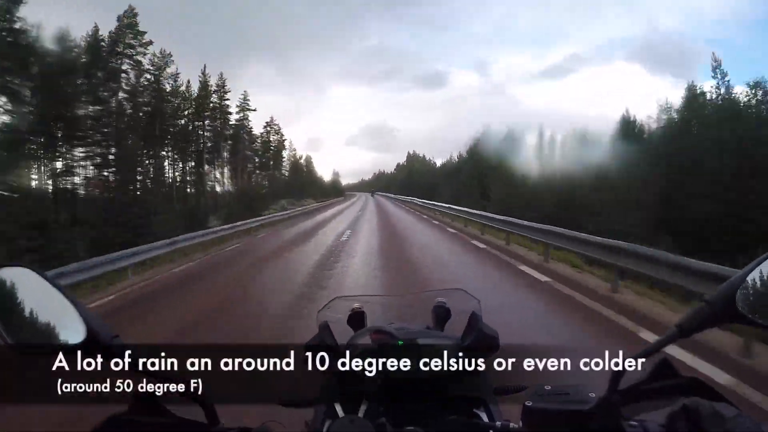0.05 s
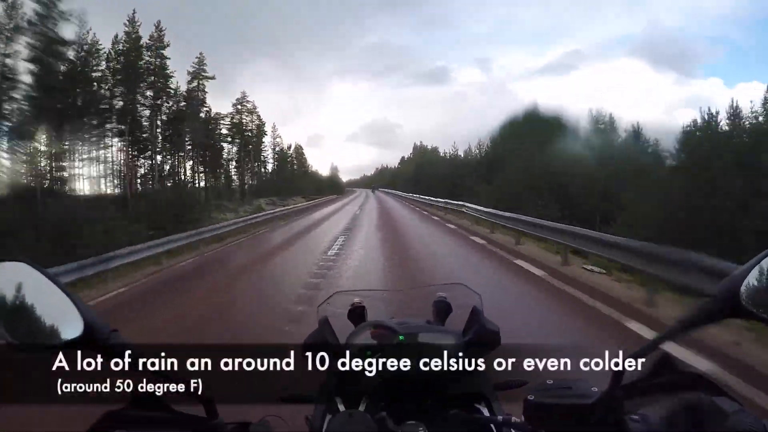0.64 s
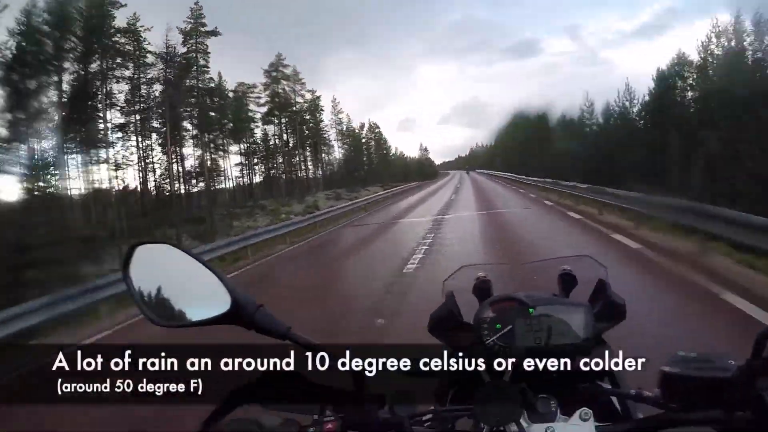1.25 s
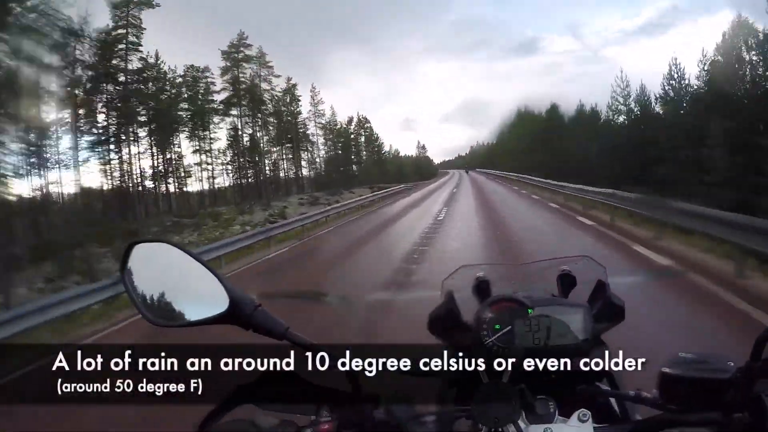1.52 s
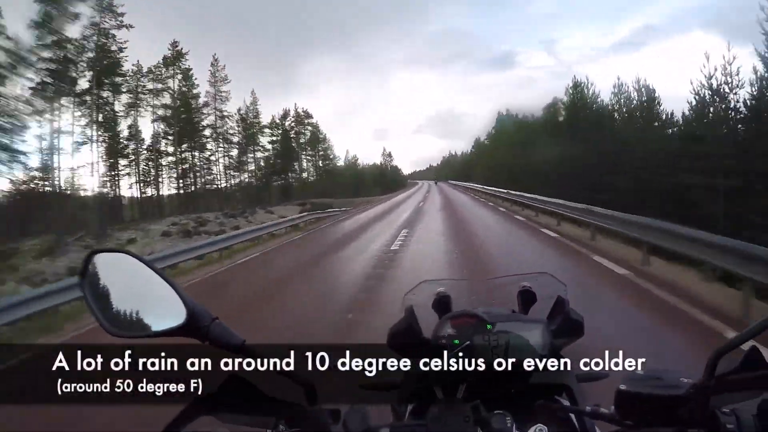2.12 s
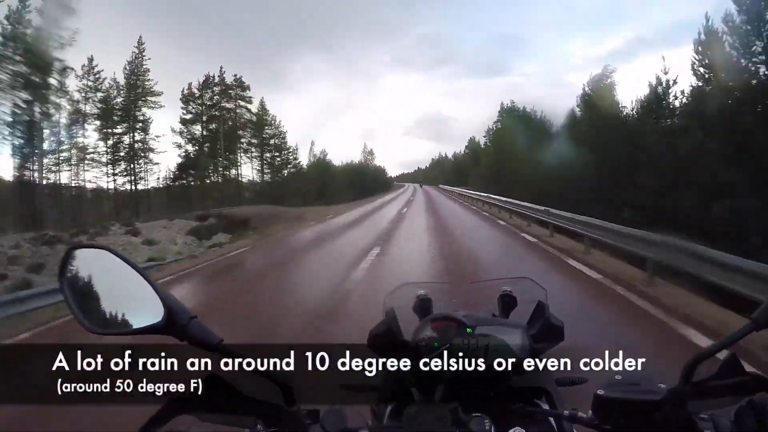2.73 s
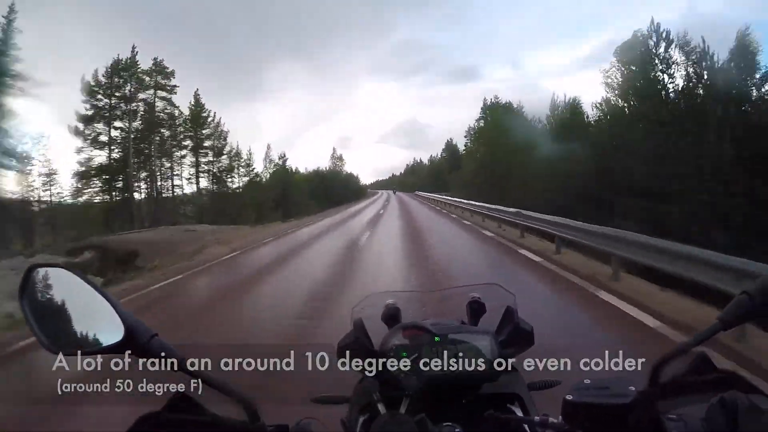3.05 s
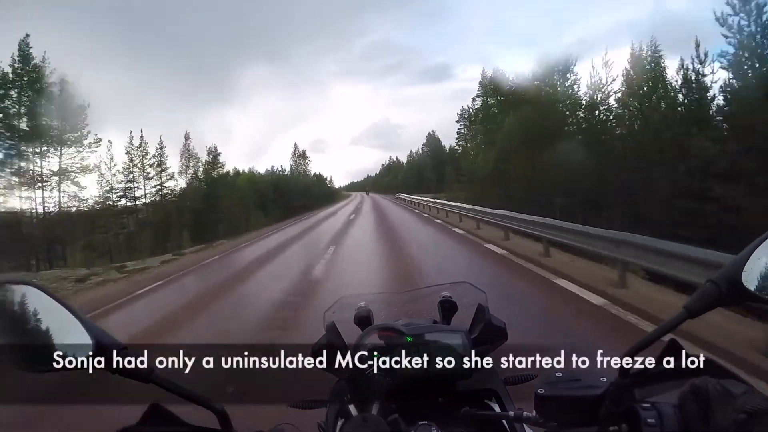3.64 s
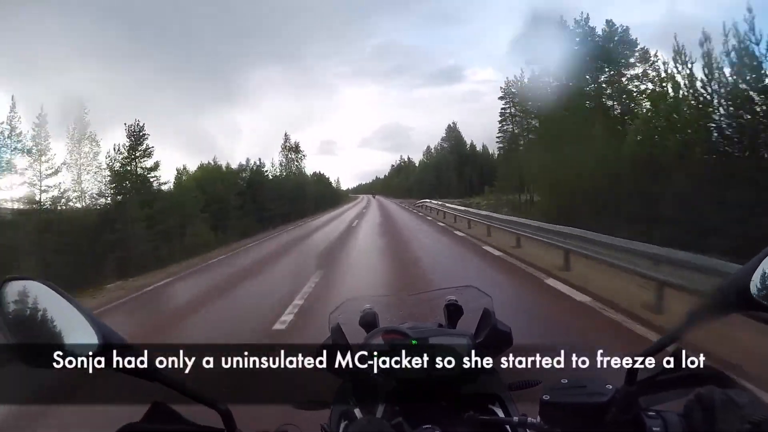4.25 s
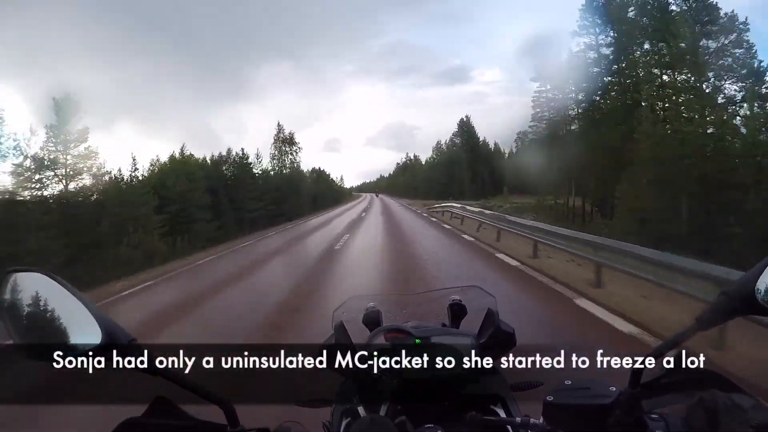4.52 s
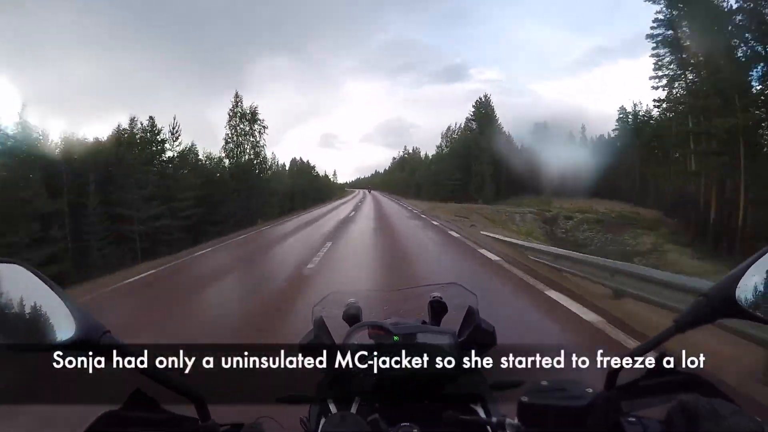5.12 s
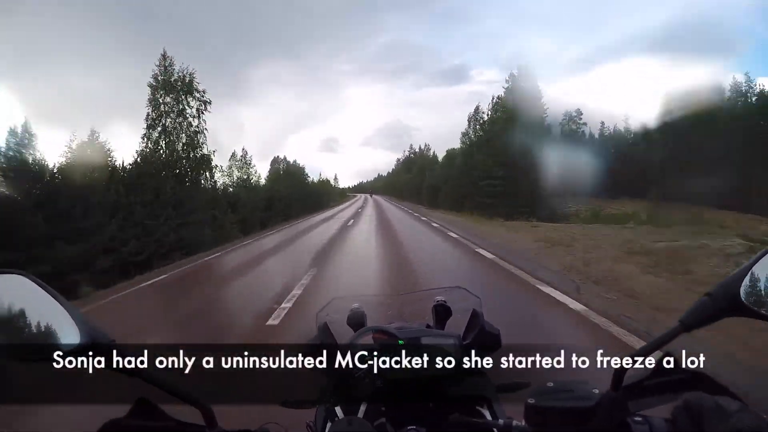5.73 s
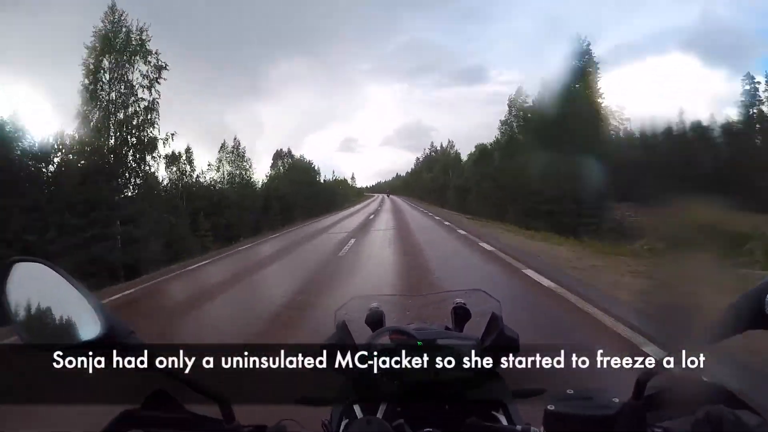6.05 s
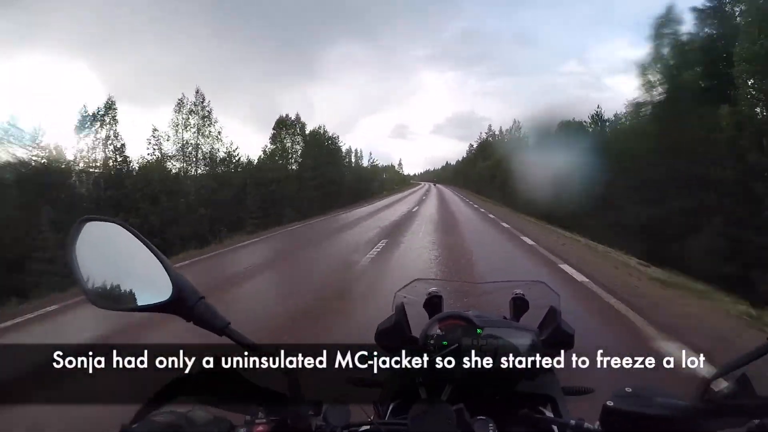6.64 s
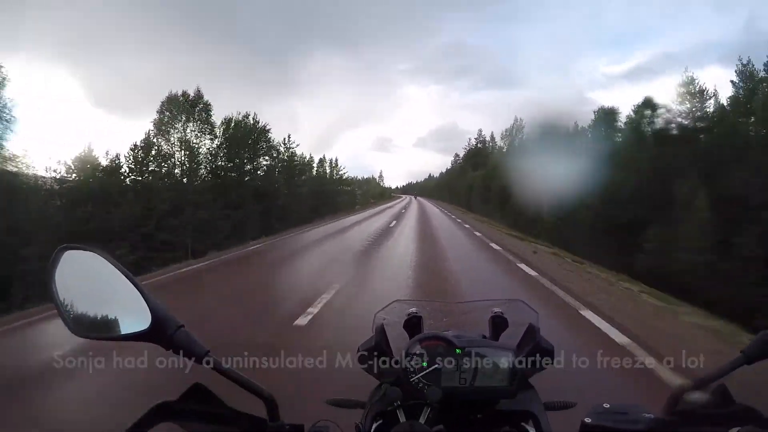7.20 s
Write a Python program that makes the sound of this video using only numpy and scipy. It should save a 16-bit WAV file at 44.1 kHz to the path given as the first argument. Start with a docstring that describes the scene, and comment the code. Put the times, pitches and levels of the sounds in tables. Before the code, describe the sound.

A motorcycle holds a constant speed on a wet road, heard from the rider's position with the wind right on the microphone. Deep, uneven thumps and a fluttering rush of air dominate, while the engine's even drone and a fine hiss of spray sit behind. Scattered water drops tick close by throughout. Gusts swell and pass with short lulls, the strongest coming near the middle and again a little later.

```python
"""A motorcycle cruises at a steady speed on a wet road, heard from a camera carried by the rider.
From the start the engine drones and spray hisses, while eddies from the windscreen thump the microphone
and tear the rush of air into a flutter. Just before 1 s the fattest of many water drops ticks on the
housing. The wind sinks near 1.8 s, then gusts hard around 3 s and 5.2 s, with brief lulls in between.
It keeps buffeting over the engine to the end, at 7.5 s."""
import sys
import numpy as np
from scipy import signal
from scipy.fft import rfft, irfft, next_fast_len
from scipy.io import wavfile
from scipy.ndimage import uniform_filter1d

SR = 44100
rng = np.random.default_rng(int(sys.argv[2]) if len(sys.argv) > 2 else 0)


def master(y):
    """Save y as 16-bit WAV."""
    cut = np.clip(np.atleast_2d(y).T, -1, 1)
    pcm = np.round(cut * 32767)  # scale
    wavfile.write(sys.argv[1], SR, pcm.astype(np.int16))


N = 329603
T = np.arange(N) / SR


def undb(db):
    """Decibels to gain."""
    return 10 ** (np.asarray(db) / 20)


def unit(x):
    """Scale to rms 1."""
    return x / np.sqrt(np.mean(x ** 2))


def noise():
    """White noise."""
    return rng.standard_normal(N)


def wobble(rate_hz):
    """Random modulator: sample and hold, smoothed twice; spread near 1."""
    hold = max(int(SR / rate_hz), 2)
    steps = np.repeat(rng.standard_normal(N // hold + 1), hold)
    return 1.113 * uniform_filter1d(uniform_filter1d(steps, hold), hold)[:N]


# resonances of the camera housing: f/Hz, width/Hz, boost/dB
HOUSING_PEAKS = [(783, 75, 4.5), (1133, 105, 5.5), (3320, 78, 5.5), (4350, 430, 6), (6740, 160, 5.5),
                 (7570, 420, 3.6)]


def colour(x, eq):
    """Shape x with an EQ curve, 12 dB/octave skirts and the resonances of the housing; rms 1."""
    size = next_fast_len(N)
    f = np.arange(size // 2 + 1) * SR / size + 1e-3
    hz, db = np.transpose(eq)
    shape_db = np.interp(np.log(f), np.log(hz), db)
    shape_db -= 40 * np.log10(np.maximum(f / hz[-1], 1) * np.maximum(hz[0] / f, 1))
    for centre, width, boost_db in HOUSING_PEAKS:
        shape_db += boost_db / (1 + (2 * (f - centre) / width) ** 2)
    return unit(irfft(rfft(x, size) * undb(shape_db), size)[:N])


# engine speed: t/s, four-stroke cycle rate/Hz
CYCLE_RATE = [(0, 28.56), (1.6, 28.52), (3.9, 28.39), (5.5, 28.42), (7.47, 28.48)]
# exhaust and engine drone: multiple of the cycle rate, level/dB
DRONE_HARMONICS = [(3, -33.5), (4, -37.5), (5, -40), (6, -45), (8, -45.5), (11, -43), (12, -47.5),
                   (13, -48.5), (14, -53), (18, -55.5), (19, -52), (21, -55), (26, -52.5), (27, -61),
                   (34, -55), (40, -59.5), (41, -54), (42, -56), (53, -57), (60, -59.5), (61, -57)]
# gear and chain whine at cruising speed: f/Hz, level/dB
GEAR_WHINE = [(1030, -69), (1345, -55.5), (1431, -63), (1488, -61), (1660, -58.5), (1919, -57),
              (2290, -60.5)]


def engine(trim_db=-0.5, waver_db=3, drift=0.001824, clatter_db=-48, blur_rad=.8):
    """Exhaust drone and gear whine follow the crankshaft and waver in the air stream; valves clatter."""
    cycle_hz = np.interp(T, *np.transpose(CYCLE_RATE))
    cycles = np.cumsum(cycle_hz * (1 + drift * wobble(5))) / SR
    partials = DRONE_HARMONICS + [(hz / cycle_hz.mean(), db) for hz, db in GEAR_WHINE]
    drone = 0
    for multiple, db in partials:
        tone = np.sin(2 * np.pi * (multiple * cycles + rng.random()) + blur_rad * wobble(16))
        drone += undb(db) * unit(tone * undb(waver_db * wobble(6)))
    valve_envelope = np.exp(-(cycles % 1) / 0.21)  # one burst a cycle
    clatter = colour(noise() * valve_envelope, RUSH_EQ)  # shares the EQ of the air rush
    return drone * undb(trim_db) + clatter * undb(clatter_db)


# bright, wet hiss: f/Hz, level/dB
SPRAY_EQ = [(1500, -5.5), (2700, 0), (3600, 3), (3950, -2.5), (4400, -2.5), (5600, 0), (6300, -3.5),
            (7300, -1.5), (9000, -1), (11300, -4), (13000, -13), (15000, -23)]


def spray(stir_db, ride_db, mist_db=-46.5, grain_db=2.5, tyres_db=-53):
    """Grainy mist, carried by the gusts and eddies, over the even hiss of the tyres."""
    grains = noise() * undb(grain_db * np.minimum(rng.exponential(size=N), 5))
    mist = colour(grains * undb(0.94 * stir_db + .5 * wobble(40)), SPRAY_EQ)
    tyres = colour(noise(), SPRAY_EQ)
    return mist * undb(mist_db + ride_db) + tyres * undb(tyres_db)


def splat(ring_hz, knock_hz, knock_db, thud_db, thud_hz=750, attack_s=.0008):
    """One drop: a spatter of a few milliseconds rings the housing over a duller knock and thud; peak 1."""
    size = 1024
    t = np.arange(size) / SR
    f = np.arange(1, size // 2 + 2) * SR / size

    def band(hz, octaves):
        return np.exp(-.5 * (np.log2(f / hz) / octaves) ** 2)

    burst = rfft(rng.standard_normal(size) * t * np.exp(-t / attack_s))
    burst /= np.sqrt(np.abs(burst))  # flatten the spatter so no one pitch stands out
    ring = .3 + band(ring_hz, octaves=.36)  # on a broadband floor
    knock = undb(knock_db) * band(knock_hz, octaves=.36)
    thud = undb(thud_db) * band(thud_hz, octaves=.7)
    high_cut = 1 / np.sqrt(1 + (f / (ring_hz + 2500)) ** 16)
    tick = irfft(burst * (ring + knock + thud) * high_cut)
    return tick / np.abs(tick).max()


# fat drops on the housing: t/s, peak level/dB, ring f/Hz, knock f/Hz, knock/dB re ring, thud/dB re ring
FAT_DROPS = [(.8621, -14.5, 6700, 2150, 6, 12), (.8769, -27, 7900, 2300, -8, -10),
             (1.941, -25.5, 6200, 3200, 1, 6), (2.9347, -28, 7300, 2300, -6, -10),
             (3.4057, -21, 7300, 2300, 4, 10), (3.603, -21.5, 8200, 3300, -2, 3),
             (3.7444, -29, 5200, 2300, -8, -10), (4.013, -20, 7700, 2150, 9, 0),
             (4.2009, -26, 8900, 2300, -10, -10), (4.2134, -28, 8400, 2300, -10, -10),
             (4.2298, -26.5, 10800, 1800, -2, -6), (4.494, -30, 6800, 2300, -8, -10),
             (5.1587, -22, 7600, 3300, -2, 2), (5.4121, -24.5, 4800, 3100, -1, 5),
             (5.7877, -26, 6900, 2300, -10, -10), (6.1613, -25, 5000, 2300, -12, -12),
             (6.9037, -30, 6300, 2300, -10, -10), (7.4026, -27, 7700, 2300, -8, -10)]


def drops(small_count=70, softest_db=-40.5):
    """Water ticks on the housing: a few fat drops among a random scatter of small ones."""
    small_drops = [(when * N / SR, softest_db + 6 * weight, 4000 + 5000 * pitch, 2300, -8, -6)
                   for when, weight, pitch in rng.random((small_count, 3))]
    ticks = np.zeros(N + SR)
    for s, db, *timbre in FAT_DROPS + small_drops:
        tick, start = splat(*timbre), int(s * SR)
        ticks[start:start + len(tick)] += undb(db) * tick
    return ticks[:N]


# wind swells: peak t/s, attack/s, release/s, rush lift/dB, buffet lift/dB, mist lift/dB
GUST_CUES = [(0.3, 0.24, 0.64, 2.5, 1.5, 2.5), (.577, 0.034, 0.04, 3.5, 3, 2),
             (0.9, 0.16, 0.097, 5, 7.5, 6), (1.168, 0.025, .03, 2, 2.5, 1), (1.41, 0.41, 0.95, 4, 2, 3.5),
             (1.417, 0.019, .025, 1, 6, 2), (1.61, .08, 0.046, 1, 2, 0), (1.873, .02, 0.017, 2.5, 3, 5),
             (2.18, 0.19, 0.26, 3.5, 5.5, 3), (2.487, 0.043, 0.031, 4, 5.5, 3.5),
             (2.77, 0.28, 0.071, 3.5, 4, 2.5), (2.955, 0.22, 0.063, 7, 8, 7),
             (3.335, 0.027, .06, 1, 6.5, 0), (3.71, 0.18, 0.22, 3.3, 8, 3.5), (3.903, .015, 0.016, 4, 8, 9),
             (3.986, 0.023, .025, 2, 5.5, -1), (4.3, 0.29, 0.74, 2.0, 5, 3.5),
             (4.301, .02, 0.024, 1, 10, -1), (4.35, 0.023, .025, -2, 9, 1), (4.805, .015, 0.025, 3, 1, 0),
             (4.92, 0.094, 0.13, 6, 7, 4.5), (5.22, 0.26, 0.22, 7.5, 5, 7), (5.49, 0.18, 0.18, 5, 5, 5),
             (5.871, 0.12, 0.039, 3.5, 7, 3), (6.38, 0.1, 0.12, 4, 3, 2.5), (6.62, 0.34, 0.28, 4, 1.3, 4),
             (7.22, 0.22, 0.22, 4.5, 6, 4.5), (7.45, 0.065, 0.11, 1, 1.5, 2.5)]


def gusts():
    """Gusts build and pass: fader rides in dB for the rush, the buffeting and the mist."""
    rides_db = 0
    for s, attack_s, release_s, *lifts_db in GUST_CUES:
        swell = np.interp(T, [s - attack_s, s, s + release_s], [0, 1, 0])
        rides_db += np.outer(lifts_db, swell)
    return rides_db


# holes in the wind: deepest t/s, ramp each way/s, rush dip/dB, rumble dip/dB (a negative dip lifts)
LULL_CUES = [(.13, 0.023, 6.5, 5), (.75, 0.049, -2, 8), (1.0, .025, 2, 2), (1.107, 0.022, 2, 2),
             (1.364, .025, 5, 0), (1.444, .016, 6, 8), (1.815, 0.082, 7.5, 10), (1.897, 0.018, 12, -1.5),
             (1.966, 0.018, 9, -1), (2.066, .025, 3, -1), (2.52, 0.028, 2.5, -1), (2.993, .015, 4, 1.5),
             (3.06, 0.031, 1, 2.5), (3.27, 0.2, 2.5, -1.5), (3.89, 0.058, 9.5, 3), (4.08, 0.023, 0, 4),
             (4.54, 0.012, 11, -4), (4.61, 0.084, 5.5, 3), (4.757, 0.079, 4.5, 1), (5.074, .022, 1, 9),
             (5.436, 0.013, 3, 5), (5.72, 0.081, 1, 2.5), (5.93, 0.028, 0.5, 4), (6.02, 0.03, 2.5, 6),
             (6.13, 0.021, 6, 12), (6.88, 0.051, 1.5, 4)]


def lulls():
    """The air stream lets go of the camera: fader rides in dB for the rush and the rumble."""
    rush_db, rumble_db = 0, 0
    for s, ramp_s, rush_dip_db, rumble_dip_db in LULL_CUES:
        calm = np.interp(T, [s - ramp_s, s, s + ramp_s], [0, 1, 0])
        rush_db -= rush_dip_db * calm
        rumble_db -= rumble_dip_db * calm
    return rush_db, rumble_db


# sub-bass rumble of the eddies: f/Hz, level/dB
RUMBLE_EQ = [(5, -14.5), (16, -2.5), (33, 1.5), (48, -4), (65, -10), (90, -17.5), (140, -36), (300, -53)]
# big vortex hits: t/s, suction re rumble rms, length crest to crest/s, duck just before/dB, slap/dB
VORTEX_HITS = [(.17, 1.8, .02, -1, 2.5), (.328, 1.8, .018, -1, 2.5), (.352, 2.3, .022, -1, 3),
               (.382, 2.6, .026, -9, 0), (.528, 2.6, .015, 0, -2), (.617, 2.3, .03, -6, -1),
               (.876, 1.8, .009, 0, 0), (.911, 2.7, .011, 0, -1), (.975, 2.2, .03, 0, 1),
               (1.220, 2.5, .016, -1, 1.5), (1.399, 3.1, .02, -4, 2), (1.617, 1.9, .02, 0, 2),
               (1.756, 3.0, .024, -2, 3), (1.941, 2.7, .021, -2, 1.5), (2.168, 2.4, .012, 0, 1),
               (2.203, 2.8, .019, 0, 1), (2.268, 2.8, .023, -1, -1), (2.722, 2.8, .013, 0, 0),
               (2.785, 2.3, .011, 0, 0), (2.975, 3.1, .02, 0, 0), (3.195, 2.3, .022, -1, 2.5),
               (3.686, 2.6, .023, 0, -1), (3.843, 2.8, .017, -1, 1), (4.015, 2.1, .012, 0, -1),
               (4.185, 2.4, .011, 0, -1), (4.455, 2.3, .018, -1, 1.5), (4.520, 3.0, .019, -1, 0),
               (4.718, 2.3, .012, 0, 0), (4.920, 2.5, .026, 0, 0), (4.973, 2.0, .011, 0, 0),
               (5.252, 3.1, .014, 0, 1), (5.490, 2.6, .021, 0, 0), (5.606, 3.2, .021, -11, 0),
               (5.832, 2.0, .012, 0, 0), (5.969, 2.3, .019, -1, 1.5), (6.073, 2.6, .018, 0, 0),
               (6.357, 1.7, .022, 0, 3), (6.417, 2.6, .028, -2, -2), (6.657, 2.9, .019, 0, -1),
               (6.826, 2.8, .026, -5, 2), (7.198, 3.4, .015, 0, -1.5), (7.304, 2.8, .015, 0, 0),
               (7.433, 2.4, .014, 0, 1)]
FLUTTER_HZ = 30  # the flow is never quite steady


def eddies(compression=0.88, window_s=0.0705, flutter_db=1.0, skew=0.077, crest=0.52):
    """Pressure of the vortices shed by the windscreen: uneven in timing, mostly alike in strength."""
    pressure = colour(noise(), RUMBLE_EQ)
    power = uniform_filter1d(pressure ** 2, int(window_s * SR))
    levelled = pressure / power ** (compression / 2)
    pressure = unit(levelled * undb(flutter_db * wobble(FLUTTER_HZ)))
    pressure = unit(pressure - skew * (pressure ** 2 - 1))  # sharp cores, round crests
    for s, depth, length_s, _, _ in VORTEX_HITS:
        # a low-pressure core between two weaker crests takes over the flow
        age = (T - s) / length_s
        near = np.abs(age) < 1
        crossfade = np.cos(np.pi / 2 * age[near])
        suction = np.cos(2 * np.pi * age[near])
        thump = -depth * np.maximum(suction, crest * suction)
        pressure[near] = (1 - crossfade) * pressure[near] + crossfade * thump
    return pressure


def turbulence(pressure, lag_s=0.00074, depth_db=2.0, release_s=0.0024):
    """Envelope of the fine turbulence in dB: strongest just after each low-pressure core."""
    stir_db = depth_db * np.interp(T - lag_s, T, -pressure)
    for s, _, length_s, duck_db, slap_db in VORTEX_HITS:
        # the flow runs smooth just ahead of a big vortex, which lands as a slap and leaves a wake
        duck = np.exp(-(4 * ((T - s) / length_s + .5)) ** 4)
        slap = np.interp(T, [s - length_s / 2, s, s + length_s, s + length_s + release_s], [0, 1, 1, 0])
        stir_db += duck_db * duck + slap_db * slap
    return stir_db


# low body of the wind: f/Hz, level/dB
BUFFET_EQ = [(45, 0.5), (85, 0.5), (140, -0.5), (170, -3), (205, -7.5), (290, -10), (400, -19),
             (700, -31.5), (1500, -52)]
# midrange rush of air: f/Hz, level/dB
RUSH_EQ = [(200, -2.5), (400, 2), (530, 4), (680, 0), (950, -0.5), (1300, -2.5), (1720, -3), (1820, -8),
           (1950, -4.5), (2320, -9), (2600, -16), (4000, -30.5)]


def airflow(stir_db, buffet_ride_db, rush_ride_db, buffet_db=-26, rush_db=-37.5, low_lag_s=0.0027):
    """Low buffeting and a broad rush, torn into bursts by the eddies; the lows land a little later."""
    late_stir_db = np.interp(T - low_lag_s, T, stir_db)
    buffet = colour(noise() * undb(1.16 * late_stir_db + 1.3 * wobble(90)), BUFFET_EQ)
    rush = colour(noise() * undb(stir_db + 0.24 * wobble(90)), RUSH_EQ)
    return buffet * undb(buffet_db + buffet_ride_db) + rush * undb(rush_db + rush_ride_db)


def scene(rumble_db=-13.5, rush_flutter_db=0.47, buffet_flutter_db=1.42):
    """Wind up front, engine and water behind; gusts and lulls ride the levels of wind and mist."""
    gust_rush_db, gust_buffet_db, gust_mist_db = gusts()
    lull_rush_db, lull_rumble_db = lulls()
    unsteady_db = lull_rush_db + rush_flutter_db * wobble(FLUTTER_HZ)
    rush_ride_db = gust_rush_db + unsteady_db
    mist_ride_db = gust_mist_db + 0.91 * unsteady_db
    buffet_ride_db = gust_buffet_db + 0.39 * unsteady_db + 0.25 * lull_rumble_db
    buffet_ride_db += buffet_flutter_db * wobble(FLUTTER_HZ)
    pressure = eddies() * undb(lull_rumble_db)
    stir_db = turbulence(pressure)
    wind = pressure * undb(rumble_db) + airflow(stir_db, buffet_ride_db, rush_ride_db)
    return (wind + spray(stir_db, mist_ride_db) + engine() + drops())[None]


def record(dry, fizz_db=-29, ceiling=.95, high_cut_hz=15000):
    """The microphone fizzes at the deepest suction and soft-clips big thumps; a filter cuts the top."""
    strain = np.clip(-dry - .48, 0, .2)
    fizzy = dry + undb(fizz_db) * strain * noise()
    rounded = fizzy / (1 + (fizzy / ceiling) ** 4) ** (1 / 4)
    high_cut = signal.ellip(8, .2, 70, high_cut_hz, fs=SR, output="sos")
    return signal.sosfilt(high_cut, rounded)


dry = scene()
out = record(dry)
master(out)
```